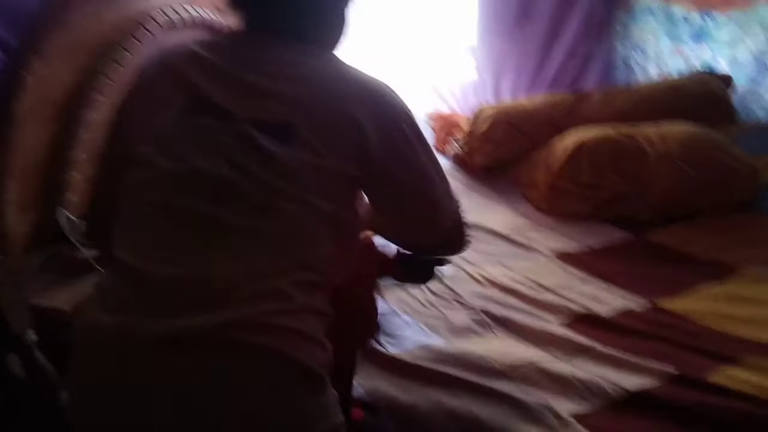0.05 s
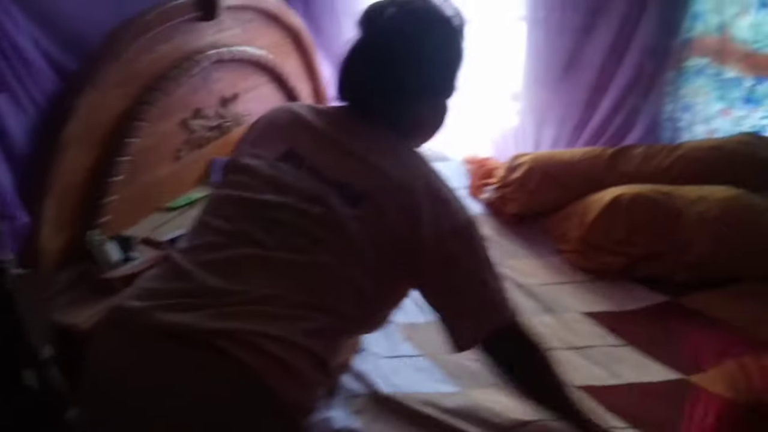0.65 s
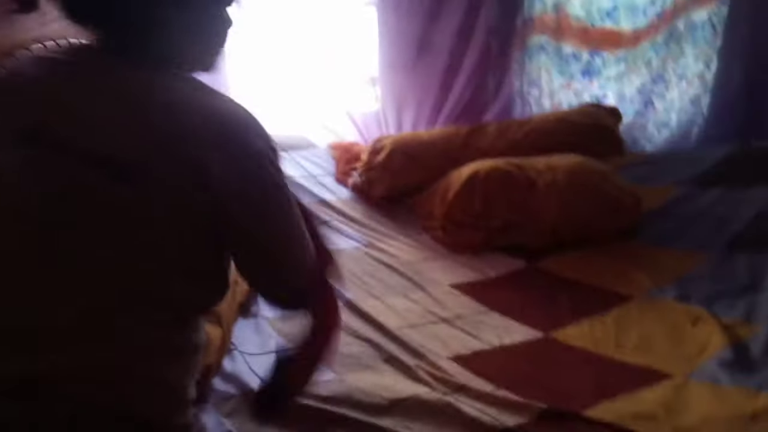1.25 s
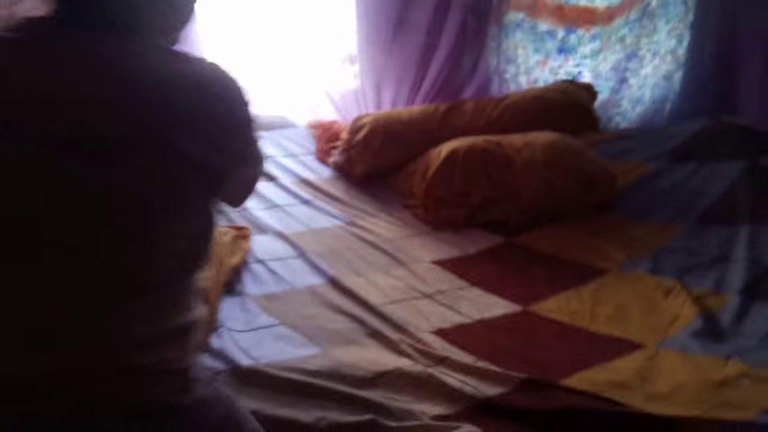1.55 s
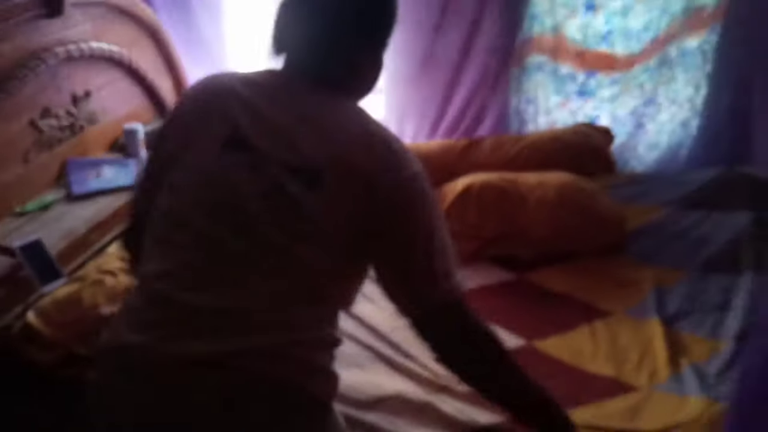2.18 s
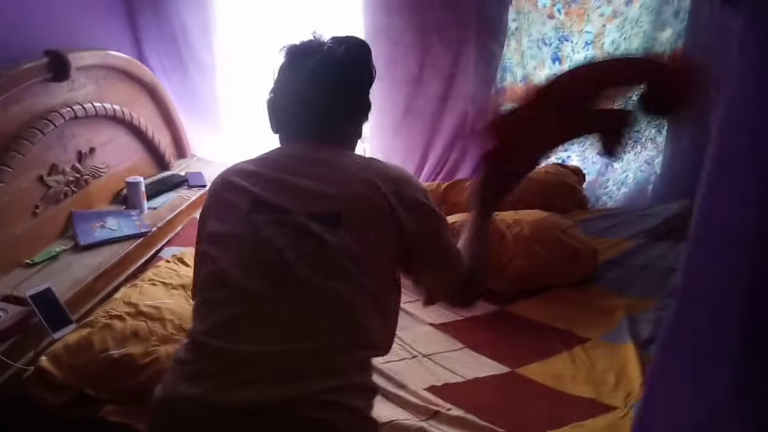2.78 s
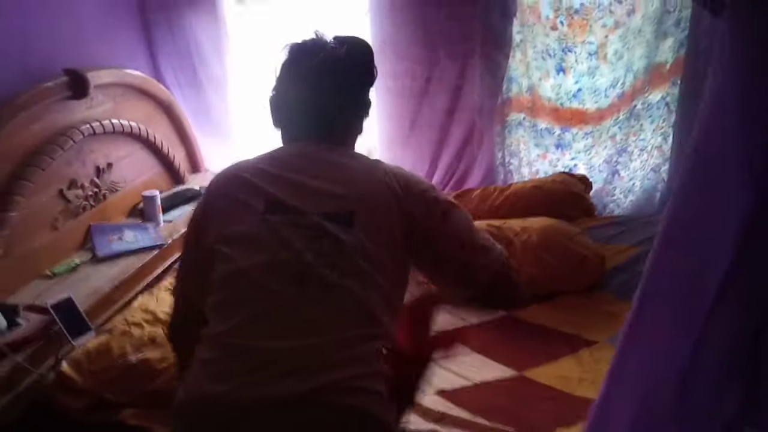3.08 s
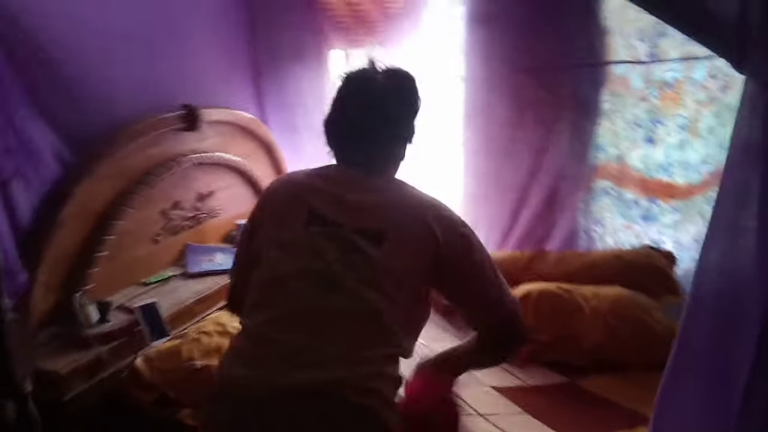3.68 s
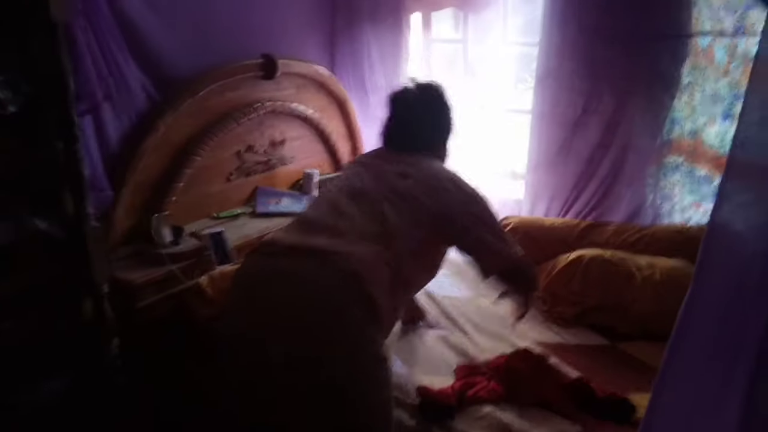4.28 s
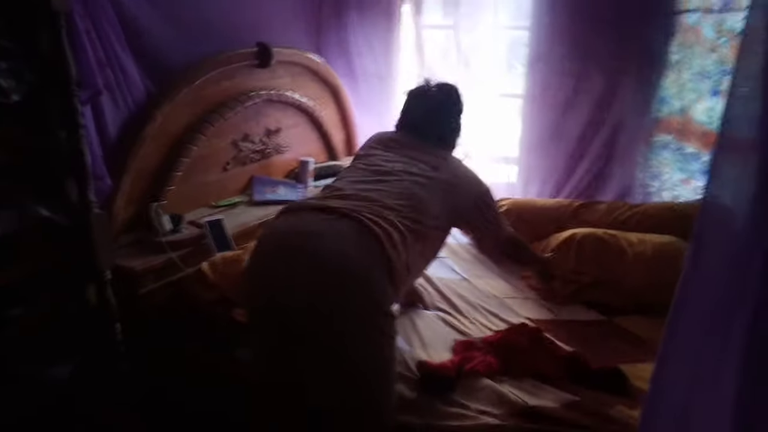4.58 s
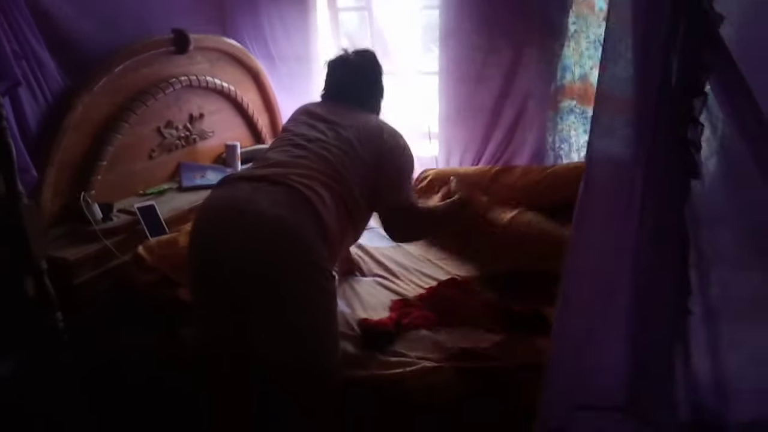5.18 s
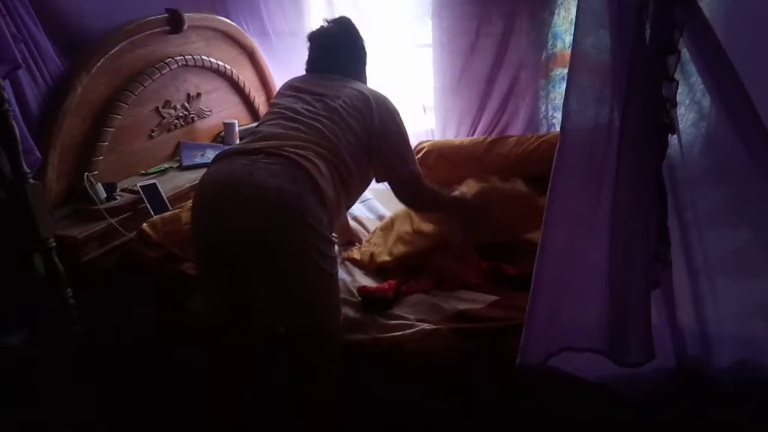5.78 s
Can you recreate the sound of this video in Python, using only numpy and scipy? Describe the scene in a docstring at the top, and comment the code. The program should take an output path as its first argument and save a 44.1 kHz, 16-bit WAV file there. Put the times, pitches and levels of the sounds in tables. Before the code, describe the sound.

In a quiet little bedroom, someone dusts a bed by hitting it with a cloth. A quick cluster of slaps comes first, then one loud smack with a low boom from the mattress, then flapping and a few more blows. The sound turns gentler as bedding rustles and slides under the hands and a pillow is dropped with a soft thud. Faint room noise lies underneath.

```python
"""Beating the dust off a bed

In a small bedroom a cloth flutters through the air, slaps the mattress and drags over the sheet.
Each blow squeezes out trapped air, cracks the cloth and sets the mattress booming. Hands gather and
smooth the fabric, its threads catching and slipping in a grainy hiss; creases snap, and a pillow is
shifted and dropped. Faint whistling tones and a steady room noise lie underneath."""
import sys
import numpy as np
from scipy import signal
from scipy.fft import rfft, irfft, next_fast_len
from scipy.io import wavfile
from scipy.ndimage import map_coordinates

SR = 44100
rng = np.random.default_rng(int(sys.argv[2]) if len(sys.argv) > 2 else 0)


def to_wav(sig):
    """Store sig (one row per channel, or 1-D mono) as 16-bit WAV at the path in sys.argv[1].

    Samples outside -1..1 are clipped; the rate is SR.
    """
    pcm = np.clip(np.atleast_2d(sig), -1, 1) * 32767
    pcm = np.round(pcm).astype(np.int16)
    wavfile.write(sys.argv[1], SR, pcm.T)  # frames by channels


N = 262157
TIME = np.arange(N) / SR


def slaps(swish_s=0.022, swish_db=-34, boom_db=-7.5, quick_rise_s=0.0089, gain_db=-2.3):
    """Each blow squeezes out trapped air and cracks the cloth; the heavy mattress booms on longer."""
    # cloth or pillow landing on the bed:
    # (time [s], rise [s], fall [s], relative thump [dB], relative smack [dB], relative crack [dB])
    blows = [(0.5398, 0.0055, 0.018, -23, -19, -12.5), (0.5714, 0.00042, 0.0012, -26, -34, -5),
             (0.651, 0.0007, 0.0085, -35, -27, -25.5), (0.781, 0.0012, 0.0054, -33, -25, -19.5),
             (0.885, 0.02, 0.0078, -39, -37, -31.5), (0.945, .035, 0.015, -44.5, -53, -46),
             (1.9071, 0.0052, 0.0093, -16, -12.5, -6.5), (2.864, 0.021, 0.0095, -25.5, -21.5, -18.5),
             (2.903, 0.0094, 0.011, -19.5, -14.5, -13.5), (3.044, 0.0022, 0.0015, -29, -22.5, -44),
             (3.594, 0.038, 0.0079, -27, -19, -23.5), (3.865, 0.00053, 0.017, -81, -36.5, -32.5),
             (4.79, 0.006, 0.0057, -49, -41, -36), (5.157, 0.085, .008, -43.5, -72, -48),
             (5.212, 0.031, 0.012, -32.5, -33, -36.5)]
    # spectra of a blow's four layers: (frequency [Hz], level [dB])
    thump_spectrum = [(90, -25), (150, 0), (240, -2), (340, -1.5), (450, -6.5), (700, -23)]
    boom_spectrum = [(35, -22.5), (60, -7), (95, -5), (125, 5.5), (170, -4), (260, -21.5)]
    smack_spectrum = [(200, -11.5), (400, -2), (800, -1), (1500, -5.5), (2300, -5), (3600, -23.5)]
    crack_spectrum = [(1400, -22), (2800, -0.5), (4300, 1.5), (5000, -6), (6600, -1), (7600, -10.5),
                      (9500, -11), (11500, -23.5), (16000, -26.5)]
    thump = colour(rng.standard_normal(N), thump_spectrum)
    boom = colour(rng.standard_normal(N), boom_spectrum)
    smack = fibres(smack_spectrum, clump_db=0, clump_rate=500)
    crack = fibres(crack_spectrum, clump_db=1.5, clump_rate=730)
    out = np.zeros(N)
    for s, rise, fall, thump_db, smack_db, crack_db in blows:
        swish = contact(crack, s - swish_s, swish_s, fall)  # just ahead of the hit
        add(out, s - swish_s, from_db(crack_db + swish_db) * swish)
        # a slow, soft landing presses deeper into the mattress and has a duller smack
        weight_db = boom_db + 1.5 * np.log2(rise / quick_rise_s)
        top_hz = np.clip(3200 * np.sqrt(quick_rise_s / rise), 600, 8000)
        padding = signal.butter(2, top_hz, fs=SR, output="sos")
        padded_smack = signal.sosfilt(padding, landing(smack, s, rise, fall, settle_db=-8) + 1e-18)
        add(out, s, from_db(thump_db + weight_db) * landing(boom, s, 1.38 * rise, 1.38 * fall))
        add(out, s, from_db(thump_db) * landing(thump, s, 1.05 * rise, 1.05 * fall))
        add(out, s, from_db(smack_db) * padded_smack)
        add(out, s, from_db(crack_db) * landing(crack, s, rise, fall, settle_db=-15))
    return from_db(gain_db) * out


def landing(texture, s, rise, fall, settle_db=-5, settle_stretch=2.76):
    """The leading part of the cloth hits; as that dies, the rest settles more slowly."""
    out = np.zeros(N)
    add(out, s, contact(texture, s, rise, fall))
    after = s + rise + fall
    add(out, after, from_db(settle_db) * contact(texture, after, fall, settle_stretch * fall))
    return out[round(s * SR):][:SR // 2]


def contact(texture, s, rise, fall):
    """The touching area grows, then the cloth comes to rest; about unit rms at the top."""
    rise, start = max(rise, 1e-4), round(s * SR)
    t = TIME[:min(int((rise + 6 * fall) * SR), N - start)]
    envelope = np.minimum(t / rise, 1) * np.exp(-np.maximum(t - rise, 0) / fall)
    burst = envelope * texture[start:][:len(t)]
    return rms_one(burst) * np.sqrt(np.mean(envelope ** 2))


def flaps(flutter_db=-14, flutter_gap_s=0.0069, spread_octaves=0.78, ripples=6):
    """A fold whips over and pushes the air for a few cycles; the free edge flutters on, unevenly."""
    out, t = np.zeros(N), TIME[:SR // 10]

    def push(hz, cycles):
        age = t * hz / cycles
        return (age * np.exp(1 - age)) ** 2 * np.sin(2 * np.pi * (hz * t + rng.random()))

    for s, level_db, hz, cycles in folds():
        add(out, s, from_db(level_db) * push(hz, cycles))
        for k, (late, detune, size) in enumerate(rng.uniform(-1, 1, (ripples, 3))):
            ripple = push(0.94 * hz * 2 ** (spread_octaves * detune), cycles=1.1)
            ripple_db = level_db + flutter_db - 0.5 * k + 5.6 * size
            add(out, s + flutter_gap_s * (k + 1 + 0.45 * late), from_db(ripple_db) * ripple)
    return out


def folds(count=3, gap_s=0.024, fade_db=11, pitch_ratio=0.87):
    """A flap runs on through the next folds, each later, weaker and lower."""
    # loose cloth puffing out air: (time [s], peak [dB], pitch [Hz], rise [cycles])
    puffs = [(0.036, -34, 940, 1.9), (0.903, -40, 446, 2.2), (0.965, -41.5, 320, 2.4),
             (2.015, -36.5, 232, 3.4), (2.305, -39.5, 490, 3.8), (2.3849, -32.5, 613, 2.8),
             (2.428, -35.5, 704, 2.8), (2.476, -33, 630, 2.5), (2.5623, -22, 855, 0.67),
             (2.648, -22, 620, 1.45), (2.806, -24, 550, 0.84), (2.818, -24, 420, 0.9),
             (2.88, -20.5, 376, 1.3), (3.623, -18.5, 420, 1.24), (3.827, -32, 580, 1.56),
             (3.869, -24.5, 640, 1.06), (4.796, -31.5, 724, 1.4), (5.211, -38, 800, 1.6)]
    return [(s + k * gap_s, level_db - k * fade_db, hz * pitch_ratio ** k, cycles)
            for s, level_db, hz, cycles in puffs for k in range(count)]


def sliding(hiss_db=-4.5, rub_db=-5.5, sheen_hz=7000, snags_per_s=25, snag_db=-9.5, stutter_db=2):
    """Fabric drags over fabric: a grainy, stuttering hiss and a lower rub, with tiny snags."""
    # spectra of the sliding sheet: (frequency [Hz], level [dB])
    hiss_spectrum = [(1200, -20.5), (1600, -10), (2400, -7), (3100, 0.5), (4200, 0), (4900, -3), (6500, 2),
                     (7400, -6), (9600, -7), (11500, -20), (16000, -19)]
    rub_spectrum = [(280, -24), (450, -13), (700, 2), (950, 3), (1200, -0.5), (1600, 0), (2200, -4.5),
                    (3000, -20)]
    hiss_gain, sheen_gain, rub_gain = strokes()
    catches = (rng.random(N) < snags_per_s / SR) * rng.uniform(0.24, 1, N)
    snag_envelope = signal.lfilter([1], [1, -np.exp(-1 / (0.001 * SR))], catches + 1e-18)  # 1 ms decay
    snags = colour(snag_envelope * rng.standard_normal(N), hiss_spectrum)
    grain = fibres(hiss_spectrum, clump_db=2, clump_rate=490) + from_db(snag_db) * snags
    treble = signal.sosfiltfilt(signal.butter(2, sheen_hz, "high", fs=SR, output="sos"), grain)
    sheen = sheen_gain * from_db(drift(18)) * treble  # flickers by about 1 dB
    hiss = hiss_gain * (grain - treble) + sheen
    rub = rub_gain * fibres(rub_spectrum, clump_db=3, clump_rate=61)
    return (from_db(hiss_db) * hiss + from_db(rub_db) * rub) * from_db(stutter_db * drift(35))


def strokes(attack_s=0.014, release_s=0.025):
    """Each stroke sets in, gains or loses speed and dies away: envelopes for hiss, sheen and rub."""
    # strokes of fabric over fabric: (time [s], length [s], relative level [dB],
    # swell from start to end [dB], rub offset [dB], treble sheen offset [dB])
    gestures = [(-0.02, 0.13, -38, -4.5, -10, 5), (0.237, 0.11, -68.5, -4, -1, -8),
                (0.489, .06, -64, -7, 8.5, 3), (0.639, 0.041, -45.5, -0.5, 18.5, -10),
                (0.804, .19, -40.5, -6, -4.5, -0.5), (1.16, 0.15, -51, -4, -13.5, -6),
                (1.313, 0.1, -55, 2, -11, 2), (1.66, 0.1, -57, 0, -21, 5.5),
                (2.037, 0.14, -50.5, -2, -7, -22), (2.221, 0.15, -41, 17, -7.5, -4),
                (2.385, 0.12, -33.5, -10, -7.5, -1.5), (2.52, .33, -46, -3, -12.5, 1),
                (3.07, 0.17, -58, 13, -3, -1), (3.28, .19, -46.5, -4, -3, -7.5),
                (3.455, 0.17, -42.5, 14, -4.5, -0.5), (3.653, 0.28, -42.5, -10.5, -3, 0.5),
                (3.931, 0.28, -45, -3, -5, -8.5), (4.226, 0.54, -58, -10, -8, -4),
                (4.569, 0.084, -55.5, 21, -23, 9), (4.669, 0.15, -42.5, 13.5, -7.5, 0.5),
                (4.823, 0.12, -39.5, 7, -13.5, 1), (4.962, 0.3, -46, -1.5, -21, 2.5),
                (5.283, 0.13, -48, -1.5, -31, -10), (5.472, 0.25, -48, -3, -20.5, -0.5),
                (5.756, 0.18, -49.5, -6.5, -15.5, 2)]
    power = np.zeros((3, N))
    for s, length, level_db, swell_db, rub_db, sheen_db in gestures:
        span = slice(max(round(s * SR), 0), round((s + length + 10 * release_s) * SR))
        t = TIME[span] - s
        envelope = np.clip(t / attack_s, 0, 1) * np.exp(-np.maximum(t - length, 0) / release_s)
        speed = from_db(level_db + swell_db * (np.minimum(t / length, 1) - 0.5))
        power[:, span] += (from_db([[0], [sheen_db], [rub_db]]) * envelope * speed) ** 2
    return np.sqrt(power)


def creases(swipe_s=0.024):
    """Creases snap taut and hands swipe: bright and weightless, as a small fold has no low notes."""
    # snaps and short swipes: (time [s], level before the low cut [dB], fall [s], low cut [Hz])
    snaps = [(0.187, -34.5, 0.004, 3840), (0.33, -38.5, 0.0039, 5000), (1.131, -31, .017, 2100),
             (1.249, -28.5, 0.0032, 2740), (1.259, -42.5, 0.016, 1200), (1.394, -42, 0.0037, 2160),
             (1.594, -36.5, 0.016, 1750), (2.119, -36.5, 0.00088, 880), (2.217, -33, 0.0054, 2820),
             (2.51, -25, 0.0008, 2010), (3.206, -44, 0.0052, 900), (3.696, -22.5, 0.0017, 2500),
             (3.918, -30.5, 0.0036, 3500), (4.297, -45.5, 0.0036, 2510), (4.52, -45, .0027, 2500),
             (4.65, -36, 0.019, 2520), (4.93, -37, .0014, 2000), (5.016, -39, 0.0028, 1990),
             (5.389, -41.5, .0037, 3120)]
    # spectrum of a snapping crease: (frequency [Hz], level [dB])
    snap_spectrum = [(700, -1), (1800, -3.5), (3500, 5), (5200, -2.5), (6500, 4), (7800, -5), (10000, -4),
                     (12000, -19.5), (16000, -15.5)]
    out, texture = np.zeros(N), fibres(snap_spectrum, clump_db=-3, clump_rate=870)
    for s, level_db, fall, low_cut_hz in snaps:
        low_cut = signal.butter(2, low_cut_hz, "high", fs=SR, output="sos")
        rise = fall ** 2 / swipe_s  # a long swipe sets in softly
        add(out, s, from_db(level_db) * signal.sosfilt(low_cut, contact(texture, s, rise, fall)))
    return out


def heaves(gain_db=-3.5):
    """The mattress heaves, dull and soft, as weight shifts on it."""
    # shifts of weight: (time [s], rise [s], fall [s], relative level [dB])
    shifts = [(0.051, 0.063, 0.017, -45), (0.22, .03, 0.038, -51), (0.68, 0.07, 0.038, -41.5),
              (1.26, 0.058, 0.047, -51.5), (2.25, 0.065, 0.087, -53.5), (2.96, 0.087, 0.0093, -35),
              (3.50, 0.061, 0.022, -46.5), (4.63, 0.062, .09, -54), (5.27, 0.046, 0.055, -39)]
    # spectrum of the moving mattress: (frequency [Hz], level [dB])
    mattress_spectrum = [(25, -21), (45, -14), (65, 4.5), (95, -1), (125, 5.5), (180, -5), (300, -18),
                         (500, -25)]
    out, texture = np.zeros(N), colour(rng.standard_normal(N), mattress_spectrum)
    for s, rise, fall, level_db in shifts:
        add(out, s, from_db(level_db + gain_db) * contact(texture, s, rise, fall))
    return out


def whistles(width_hz=70):
    """Faint, airy tones, each a narrow band of noise that glides, swells and fades."""
    # thin background tones: (time [s], length [s], level [dB], starting pitch [Hz], glide [Hz/s])
    tones = [(1.356, 0.31, -66, 824, 299.5), (3.198, 0.061, -50, 950, -900), (5.55, 0.22, -62, 709, 7)]
    out, blur = np.zeros(N), (drift(width_hz) + 1j * drift(width_hz)) / np.sqrt(2)
    for s, length, level_db, hz, glide in tones:
        t = TIME[:int(length * SR)]
        sweep = np.exp(2j * np.pi * (hz + glide * t / 2) * t)
        tone = np.real(blur[round(s * SR):][:len(t)] * sweep)
        add(out, s, from_db(level_db) * np.sqrt(np.sin(np.pi * t / length)) * tone)
    return out


def body_echoes(x, bounce=0.36, nearest_s=0.0005, count=3):
    """Short echoes off the moving arms and back make peaks and notches that wander."""
    out = x
    for k in range(count):
        lag_s = nearest_s * 2 ** k * np.exp(0.22 * drift(5))
        echo = map_coordinates(x, [np.arange(N) - lag_s * SR], order=3)
        out = out + bounce * (-1) ** k * echo
    return out / np.sqrt(1 + count * bounce ** 2)


def bedroom(x, wet_db=-9.5, patterns=6):
    """The echo pattern changes as the cloth moves about; standing waves ring between the walls."""
    # standing waves: (frequency [Hz], width [Hz], relative gain [dB])
    room_modes = [(125.2, 5.1, -0.5), (253, 11, -4.5), (324, 7.8, -10.5), (460, 14, -14), (798, 6.6, -10.5),
                  (1033, 6.6, -6.5)]
    out, centres_s = x, np.linspace(0, TIME[-1], patterns)
    for s in centres_s:
        crossfade = np.sqrt(np.maximum(1 - np.abs(TIME - s) / centres_s[1], 0))
        out = out + from_db(wet_db) * signal.oaconvolve(x * crossfade, room_tail())[:N]
    for hz, width_hz, mode_db in room_modes:
        out = out + from_db(mode_db) * signal.lfilter(*signal.iirpeak(hz, hz / width_hz, fs=SR), x)
    return out / np.sqrt(1 + from_db(wet_db) ** 2)


def room_tail(first_echo_s=0.0017):
    """One pattern of diffuse echoes, dying band by band; about unit gain."""
    # reverberation of the bedroom: (frequency [Hz], time to fall 60 dB [s])
    room_t60 = [(100, 0.18), (300, 0.17), (1000, 0.31), (4000, 0.21), (12000, 0.48)]
    t, edges_hz = TIME[:SR // 2], np.geomspace(40, 18000, 10)
    tail = np.zeros(len(t))
    for low, high in zip(edges_hz, edges_hz[1:]):
        band_pass = signal.butter(2, [low, high], "band", fs=SR, output="sos")
        decay = np.exp(-np.log(1000) * t / at_hz(room_t60, np.sqrt(low * high)))
        band = signal.sosfilt(band_pass, rng.standard_normal(len(t))) * decay * (t > first_echo_s)
        tail += band * np.sqrt(2 * (high - low) / SR / np.sum(band ** 2))
    return tail


def room_tone(level_db=-64.5):
    """The still room: a faint, steady rumble with a trace of hiss."""
    # spectrum of the still room: (frequency [Hz], level [dB])
    quiet_spectrum = [(25, -15), (60, 2), (120, 1), (350, -12), (700, -20.5), (1200, -19), (3000, -20.5),
                      (6300, -16), (9500, -21), (12000, -33), (16000, -33)]
    return from_db(level_db) * colour(rng.standard_normal(N), quiet_spectrum)


def fibres(spectrum, clump_db, clump_rate):
    """Countless threads catch and slip, in clumps of uneven strength."""
    noise = rng.standard_normal(N)
    clumps = from_db(clump_db * np.clip(drift(clump_rate), -2, 2))
    return colour(noise * clumps, spectrum)


def colour(x, spectrum):
    """Give a steady texture a spectrum that falls away past both ends; unit rms."""
    size = next_fast_len(N, real=True)
    hz = np.maximum(np.fft.rfftfreq(size, 1 / SR), 1)
    skirts = np.minimum(hz / spectrum[0][0], 1) ** 2 * np.minimum(spectrum[-1][0] / hz, 1) ** 2
    shaped = rfft(x, size) * from_db(at_hz(spectrum, hz)) * skirts
    return rms_one(irfft(shaped, size)[:N])


def drift(rate):
    """A random wander of unit rms, taking rate steps a second."""
    return rms_one(np.interp(TIME * rate, np.arange(N), rng.standard_normal(N)))


def at_hz(points, hz):
    """Read a table on a log-frequency axis."""
    known_hz, values = np.transpose(points)
    return np.interp(np.log(hz), np.log(known_hz), values)


def add(out, s, sound):
    """Mix a short sound in at time s."""
    start = max(round(s * SR), 0)
    out[start:start + len(sound)] += sound[:N - start]


def from_db(db):
    """Decibels to gain."""
    return 10 ** (np.asarray(db) / 20)


def rms_one(x):
    """Scale a sound to unit power."""
    return x / np.sqrt(np.mean(x ** 2) + 1e-20)


def scene():
    """Cloth, bed and faint whistles sound in the bedroom, over its room tone."""
    quiet = room_tone()
    direct = slaps() + flaps() + heaves() + whistles() + body_echoes(creases() + sliding())
    return (bedroom(direct) + quiet)[None]


def record(dry, bass_cut_hz=48, top_cut_hz=16200):
    """A small microphone loses the deep bass, clips any peak past full scale and cuts the top."""
    bass_cut = signal.butter(2, bass_cut_hz, "high", fs=SR, output="sos")
    top_cut = signal.ellip(12, 0.1, 85, top_cut_hz, fs=SR, output="sos")
    clipped = np.clip(signal.sosfilt(bass_cut, dry), -1, 1)
    return signal.sosfilt(top_cut, clipped)


dry = scene()
out = record(dry)
to_wav(out)
```